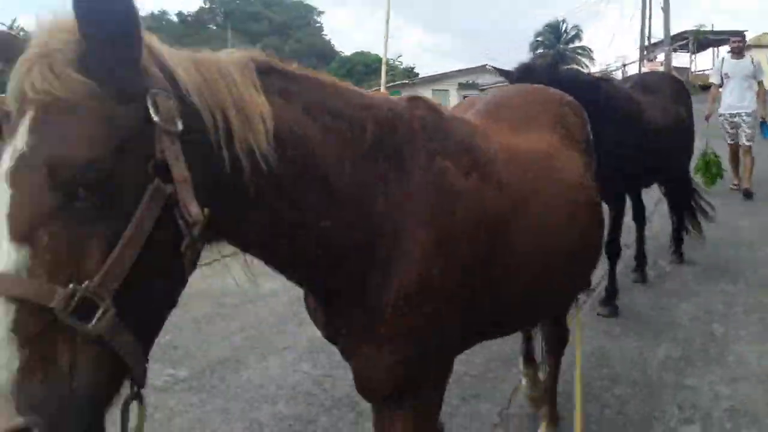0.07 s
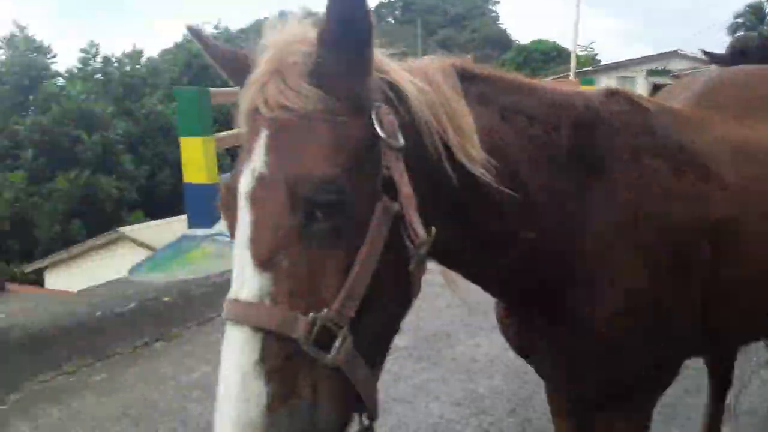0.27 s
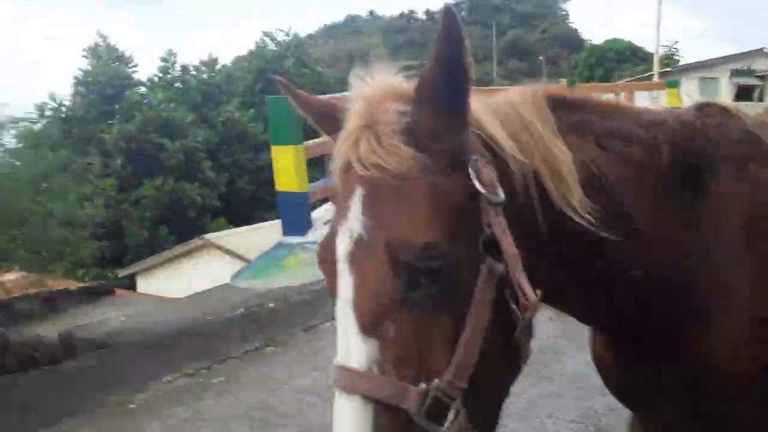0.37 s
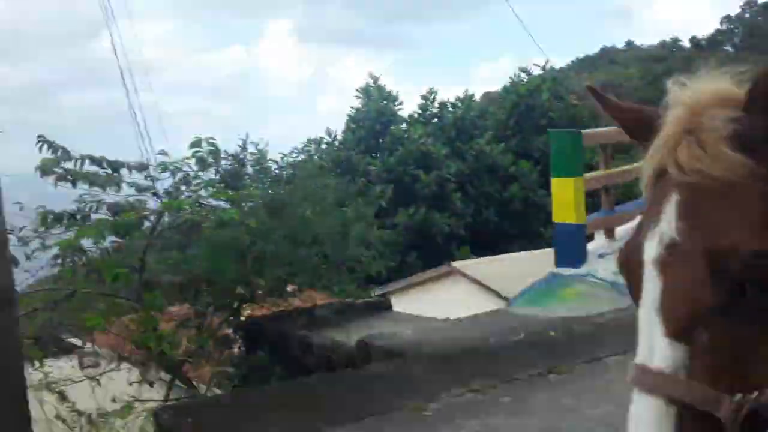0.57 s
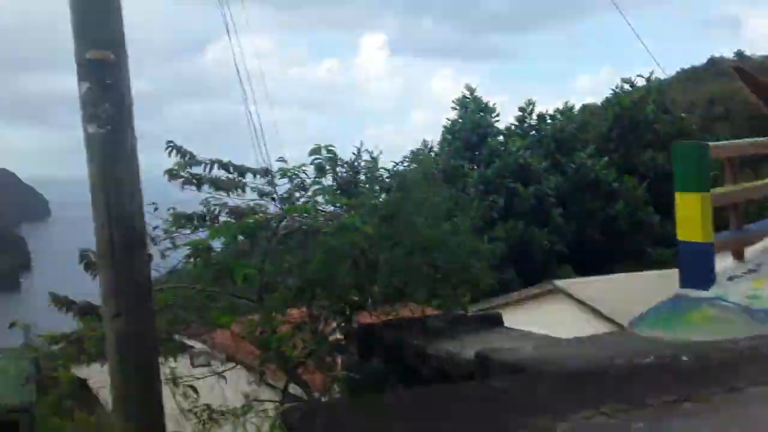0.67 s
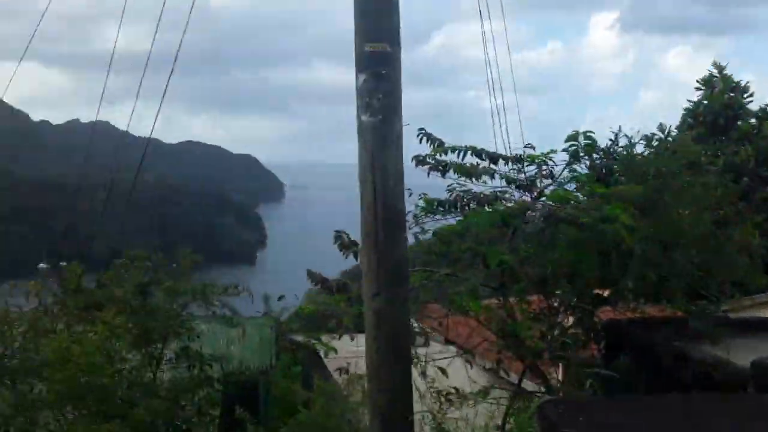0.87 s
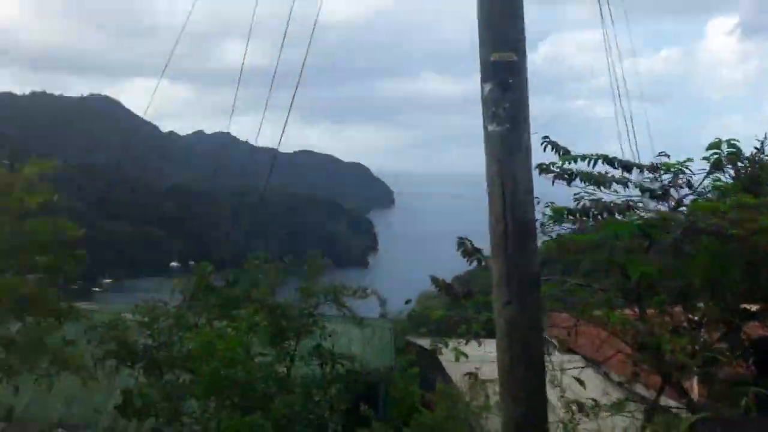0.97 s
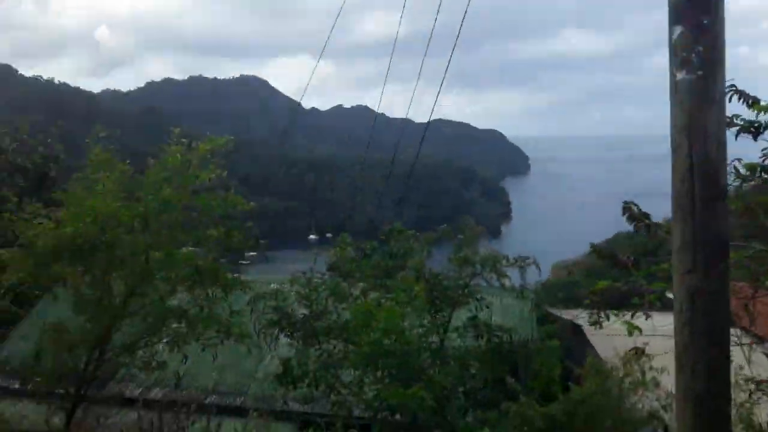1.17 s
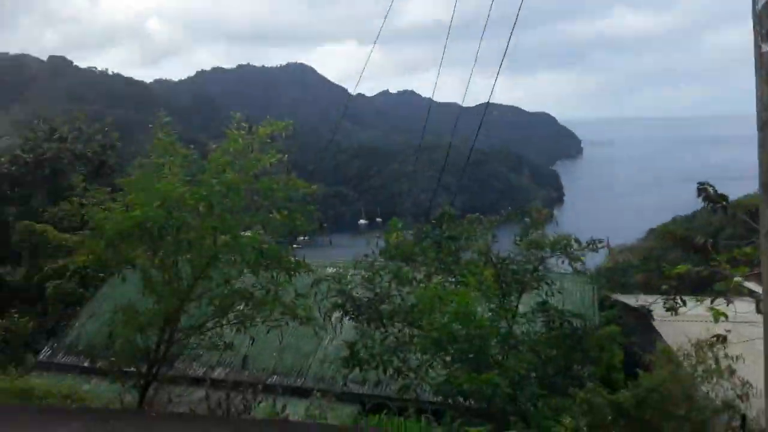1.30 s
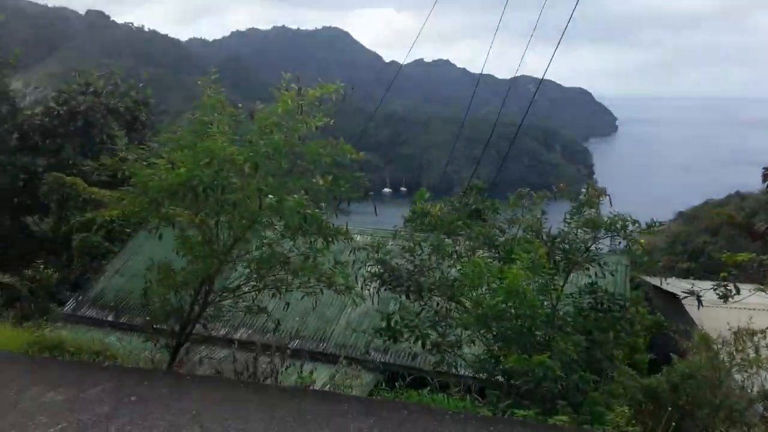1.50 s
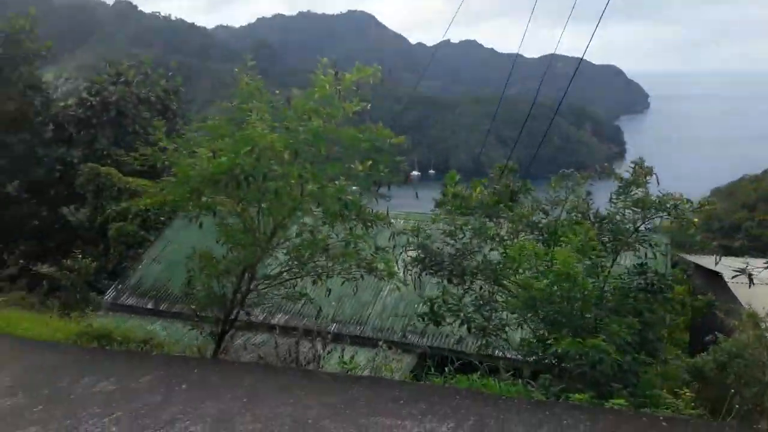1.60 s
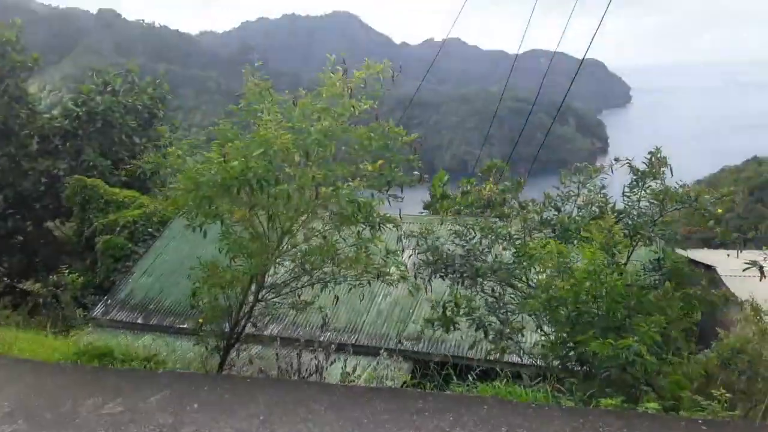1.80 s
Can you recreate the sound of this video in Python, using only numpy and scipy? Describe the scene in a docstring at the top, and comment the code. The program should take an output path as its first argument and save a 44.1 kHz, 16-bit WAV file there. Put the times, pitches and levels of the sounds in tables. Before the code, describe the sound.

Irregular horse hooves knock on an outdoor road, partly covered at first by wind thumping on the microphone. A nearby halter buckle clinks faintly, then the gust settles and the hoof taps continue among a few dull footsteps.

```python
"""Horses on a paved road

Hooves knock, ring and scuff over grit, among the dull pats of soft soles. Close by, a halter buckle
jingles as its steel parts collide. A gust buffets the microphone and settles to a low rumble.
Behind it all are a faint outdoor hiss and one thin, distant bird whistle."""
import sys
import numpy as np
from scipy import signal
from scipy.fft import rfft, irfft, next_fast_len
from scipy.io import wavfile
from scipy.ndimage import map_coordinates

SR = 44100
rng = np.random.default_rng(int(sys.argv[2]) if len(sys.argv) > 2 else 0)


def generate_wav(sig):
    """Save sig (samples, or channels by samples) to the path in sys.argv[1] as 16-bit PCM at SR."""
    pcm = np.round(np.clip(np.atleast_2d(sig).T, -1, 1) * 32767).astype(np.int16)
    wavfile.write(sys.argv[1], SR, pcm)


N = 81585


def amp(db):
    """Amplitude ratio of a level in decibels."""
    return 10 ** (np.asarray(db) / 20)


def clock(size):
    """Sample times in seconds."""
    return np.arange(size) / SR


def curve(points):
    """Linear interpolation between (time_s, value) points."""
    return np.interp(clock(N), *np.transpose(points))


def arch(start_s, length_s):
    """Half-sine envelope."""
    return np.sin(np.pi * np.clip((clock(N) - start_s) / length_s, 0, 1))


def fade(t, t60):
    """Exponential decay, 60 dB in t60 seconds."""
    return np.exp(-np.log(1000) * t / t60)


def wobble(rate_hz):
    """Smooth random modulation: a spline through Gaussian knots."""
    return map_coordinates(rng.standard_normal(2048), [clock(N) * rate_hz], mode="mirror")


def colour(x, spectrum):
    """Minimum-phase filter through (frequency_hz, gain_db) points."""
    size = 2 * next_fast_len(len(x))
    hz, db = np.transpose(spectrum)
    gain_db = np.interp(np.log(np.fft.rfftfreq(size, 1 / SR) + 1), np.log(hz), db)
    cepstrum = irfft(np.log(amp(gain_db)), size)
    cepstrum[1:size // 2] *= 2  # folding makes the filter causal
    cepstrum[size // 2 + 1:] = 0
    return irfft(rfft(x, size) * np.exp(rfft(cepstrum)), size)[:len(x)]


def noise(spectrum, size=N):
    """Filtered Gaussian noise of rms 1."""
    x = colour(rng.standard_normal(size), spectrum)
    return x / np.sqrt(np.mean(x ** 2) + 1e-20)


def impact(t, spectrum, t60):
    """Impulsive excitation: a pulse and decaying noise, filtered and scaled to peak 1."""
    force = rng.standard_normal(len(t)) * fade(t, t60) / 2
    force[0] = 2
    x = colour(force, spectrum)
    return x / np.abs(x).max()


def modal_ring(t, pitch_hz, modes):
    """Free vibration: a sum of damped modes, each slightly random in strength."""
    return sum(amp(db + rng.normal(0, 1)) * fade(t, t60) * np.sin(2 * np.pi * pitch_hz * ratio * t)
               for ratio, db, t60 in modes)


def add(out, start_s, x):
    """Superpose x on out from start_s."""
    i = min(max(round(start_s * SR), 0), N)
    out[i:i + len(x)] += x[:N - i]


# Spectra of still air, rustle and high swishes: frequency_hz, gain_db
AIR_SPECTRUM = [(30, -5), (120, -19.5), (400, -10.5), (1000, -24), (2200, -29), (5000, -81.5),
                (7000, -38.5), (16000, -31)]
RUSTLE_SPECTRUM = [(300, 0.5), (800, 8), (1250, 2), (2300, 4), (3900, 4.5), (5400, 1), (7000, -13.5),
                   (8200, -11), (9600, -28.5), (12000, -12), (14000, -13.5), (16000, -27.5)]
SWISH_SPECTRUM = [(5000, -29), (8000, -11), (9200, -10), (10300, -17), (12500, -30)]
# Envelope of the rustle: time_s, level_db
RUSTLE_ENVELOPE = [(0, -53), (.12, -54.5), (.33, -49), (.45, -53), (.53, -56.5), (.75, -56.5), (.86, -58.5),
                   (1.0, -60.5), (1.12, -68.5), (1.22, -63.5), (1.3, -57), (1.42, -56.5), (1.5, -60),
                   (1.64, -58.5), (1.75, -63.5), (1.85, -58)]
# Faint swishes: start_s, length_s, level_db
HIGH_SWISHES = [(1.103, 0.093, -72.5), (1.583, 0.057, -74)]


def outdoor_hiss():
    """Amplitude-modulated noise: a grainy rustle and brief swishes over steady air."""
    rustle_db = curve(RUSTLE_ENVELOPE) + 2 * wobble(300) + 1.2 * wobble(34.62)
    rustle = amp(rustle_db) * noise(RUSTLE_SPECTRUM)
    swish_gain = sum(amp(db) * arch(start_s, length_s) for start_s, length_s, db in HIGH_SWISHES)
    return rustle + swish_gain * noise(SWISH_SPECTRUM) + amp(-67) * noise(AIR_SPECTRUM)


def bird():
    """Frequency modulation: a distant, nearly pure whistle wavers slightly about one pitch."""
    pitch_hz = 2267 + 8 * wobble(65)
    phase = 2 * np.pi * np.cumsum(pitch_hz) / SR
    return amp(-62.5) * arch(start_s=1.555, length_s=0.26) * np.sin(phase)


# Spectra of the gust, steady breeze, low-midrange flutter and eddy pops: frequency_hz, gain_db
GUST_SPECTRUM = [(20, -25.5), (40, -21), (62, -8), (95, -3), (135, -1.5), (220, -11.5), (320, -20),
                 (500, -34), (900, -67), (2500, -86)]
BREEZE_SPECTRUM = [(20, -8), (45, 3.5), (70, 11.5), (130, -6), (250, -16), (600, -31)]
FLUTTER_SPECTRUM = [(80, -12), (190, 0), (340, -3.5), (480, -15.5), (700, -25), (1100, -46), (2500, -43)]
POP_SPECTRUM = [(100, -42.5), (300, 4.5), (550, 1.5), (800, -4.5), (1200, -18.5), (2000, -46), (5000, -77)]
# Envelopes of gust and flutter, before band-limiting: time_s, level_db
GUST_ENVELOPE = [(0, -69), (.11, -61.5), (.17, -43), (.205, -26.5), (.24, -33.5), (.34, -36), (.42, -28),
                 (.46, -31), (.55, -24), (.61, -33.5), (.7, -23), (.78, -25.5), (.86, -43.5), (.91, -44.5),
                 (1.05, -51), (1.13, -49.5), (1.2, -39), (1.28, -47), (1.38, -37), (1.47, -42), (1.56, -39),
                 (1.69, -40), (1.85, -40)]
FLUTTER_ENVELOPE = [(.15, -72), (.23, -54.5), (.28, -32.5), (.35, -27), (.4, -42), (.45, -32.5), (.56, -30),
                    (.61, -37.5), (.7, -33.5), (.76, -36), (.83, -52), (.9, -64)]
# Single eddies: centre_s, level_db, pitch_hz, relative_pop_db
WIND_EDDIES = [(.21, -14.5, 119, -22), (0.256, -25, 250, -34), (0.428, -23.5, 324, -4),
               (0.474, -13.5, 167, -6.5), (0.49, -16.5, 398, -5.5), (.52, -15, 292, -9),
               (.531, -13.5, 170, -7), (.539, -8.5, 139, -19), (0.574, -10, 183, -11),
               (0.586, -14.5, 158.5, -37), (0.641, -15, 233, -12.5), (0.688, -13.5, 216, -12),
               (0.696, -10.5, 141, -48), (0.7451, -15.5, 231, -7), (0.752, -17.5, 302, -2.5),
               (0.776, -15.5, 143, -25), (0.942, -26, 123, -43), (1.089, -32, 180, -15),
               (1.145, -25.5, 166, -16.5), (1.211, -21.5, 199, -17), (1.219, -19.5, 167, -22)]


def wind():
    """Turbulent pressure at the microphone: the flow rumbles and flutters, single eddies thump and pop."""
    out = amp(curve(GUST_ENVELOPE)) * noise(GUST_SPECTRUM) + amp(-50.5) * noise(BREEZE_SPECTRUM)
    out += amp(curve(FLUTTER_ENVELOPE) + 2 * wobble(90)) * noise(FLUTTER_SPECTRUM)
    t = clock(4096)
    middle_s = t.mean()
    width_cycles, roundness = 0.53, 1.7  # roundness: 1 is a pointed peak, 2 a Gaussian
    for centre_s, level_db, pitch_hz, pop_db in WIND_EDDIES:
        cycles = (t - middle_s) * pitch_hz
        swell = np.exp(-np.abs(cycles / width_cycles) ** roundness)
        thump = swell * np.cos(2 * np.pi * (cycles + rng.random()))
        add(out, centre_s - middle_s, amp(level_db) * thump)
        add(out, centre_s, amp(level_db + pop_db - 3) * impact(t, POP_SPECTRUM, t60=0.0056))
    out = signal.sosfilt(signal.butter(3, 910, "low", fs=SR, output="sos"), out)
    # The microphone sheds the lowest bass.
    return signal.sosfilt(signal.butter(2, 68.6, "high", fs=SR, output="sos"), out)


# Spectrum of rubbing fittings: frequency_hz, gain_db
SLIDE_SPECTRUM = [(1000, 2), (3800, -21), (5300, 14), (7000, -27), (9500, -13), (11000, -1.5), (13300, -12),
                  (16000, -25)]
# Slips of the fittings: start_s, length_s, level_db
HALTER_SLIDES = [(0.137, 0.023, -67), (0.691, 0.042, -58), (1.637, 0.0098, -64)]


def halter_slides():
    """Sliding friction: halter fittings rub together with a thin, uneven rasp."""
    strokes = sum(amp(db) * arch(start_s, length_s) for start_s, length_s, db in HALTER_SLIDES)
    return strokes * amp(6.1 * wobble(900)) * noise(SLIDE_SPECTRUM)


# Spectrum of a steel contact: frequency_hz, gain_db
CLICK_SPECTRUM = [(500, 11), (2000, 7), (3800, 7), (5600, 9), (7000, -11), (9300, -16.5), (11000, -1.5),
                  (13500, -0.5), (16000, -13.5)]
# Modes of the buckle: pitch_ratio, gain_db, t60_s
BUCKLE_MODES = [(.775, -15, .025), (.975, -6, .02), (1, 0, .075)]
# Buckle contacts: start_s, click_gain_db, ring_gain_db, pitch_hz
BUCKLE_CLINKS = [(.1295, -36, -41, 13550), (.1665, -28, -44, 13150), (.204, -52, -48, 13620),
                 (.221, -46, -48, 13620), (.513, -32, -60, 13600), (.5855, -46, -41, 13650),
                 (.7625, -30, -41, 13610), (.7825, -27, -47, 13200), (.8575, -38, -64, 13100),
                 (.95, -52, -49, 13620), (1.4385, -41, -49, 13660), (1.64, -46, -56, 13200)]


def buckle():
    """Impact excitation of small steel parts: a click, a rattle and very high ringing modes."""
    out, t = np.zeros(N), clock(9000)
    for start_s, click_db, ring_db, pitch_hz in BUCKLE_CLINKS:
        ring = modal_ring(t, pitch_hz, BUCKLE_MODES)
        ring *= 1 + 0.45 * wobble(260)[:len(t)]  # loose parts make the ring stutter
        rattle = amp(-16) * noise(CLICK_SPECTRUM, len(t)) * fade(t, t60=0.05)
        click = impact(t, CLICK_SPECTRUM, t60=0.0034)
        add(out, start_s, amp(click_db + 2.5) * (click + rattle) + amp(ring_db - 7) * ring)
    return out


# Spectrum of a soft sole: frequency_hz, gain_db
SOLE_SPECTRUM = [(100, -20), (300, -4), (500, 2), (900, -7), (2000, -15.5), (5000, -56), (16000, -75)]
# Soft footfalls: start_s, peak_db
FOOTFALLS = [(0.997, -38.5), (1.2464, -38), (1.577, -35.5), (1.5972, -28.5), (1.821, -33.5)]


def soft_steps():
    """Compliant contact: soft soles give dull pats with little treble."""
    out, t = np.zeros(N), clock(6000)
    for start_s, peak_db in FOOTFALLS:
        add(out, start_s, amp(peak_db) * impact(t, SOLE_SPECTRUM, t60=0.022))
    return out


# Spectrum of grit, scraped or crushed: frequency_hz, gain_db
GRIT_SPECTRUM = [(200, -9), (600, 15), (1200, 11), (2300, 9), (3200, 5.5), (4200, 10), (5500, -7),
                 (7000, -18), (9500, -20), (13000, -61), (16000, -13)]
# Hoof drags: start_s, length_s, level_db
HOOF_SCUFFS = [(0.132, 0.15, -52.5), (0.202, 0.042, -56.5), (0.418, .04, -62), (1.295, .09, -58),
               (1.802, 0.052, -42.5)]


def hoof_scuffs(attack_s=0.029, grain_db=4.5):
    """Friction on a rough surface: hooves drag over grit in scrapes that rise fast and run out."""
    out = np.zeros(N)
    for start_s, length_s, level_db in HOOF_SCUFFS:
        stroke = curve([(start_s, 0), (start_s + attack_s, 1), (start_s + length_s, 0)])
        out += amp(level_db + grain_db * wobble(700)) * stroke * noise(GRIT_SPECTRUM)
    return out


# Stones cracking under the hooves: start_s, gain_db, pitch_hz
STONE_SNAPS = [(0.1326, -30.5, 2900), (0.453, -31.5, 4150), (0.727, -37.5, 2740), (0.7884, -45, 5200),
               (.813, -39, 3530), (1.279, -41.5, 5200), (1.323, -33.5, 4060), (1.336, -38, 2600),
               (1.353, -40, 3000), (1.512, -39.5, 3260), (1.536, -46, 5400)]


def stone_snaps(roughness=0.52):
    """Brittle fracture: small stones crack with a short, rough ring."""
    out, t = np.zeros(N), clock(2048)
    for start_s, gain_db, pitch_hz in STONE_SNAPS:
        ring = np.sin(2 * np.pi * pitch_hz * t) + roughness * noise(GRIT_SPECTRUM, len(t))
        add(out, start_s, amp(gain_db) * fade(t, t60=0.014) * ring / 2)
    return out


# Spectrum of a knock on the road: frequency_hz, gain_db
KNOCK_SPECTRUM = [(100, 22), (400, 22), (1000, 9.5), (2400, 4.5), (4500, -11.5), (6500, -48), (9000, -51),
                  (16000, -63)]
# Modes of the hollow hoof: pitch_ratio, gain_db, t60_s
HOOF_RESONANCES = [(1, 4, .007), (1.2, -3, .006), (1.95, -10, .005)]
# Hoof strikes: start_s, ring_peak_db, pitch_hz, relative_knock_db
HOOF_STRIKES = [(0.0596, -39, 2480, -11), (0.1374, -34, 1510, 2.5), (0.222, -35, 2480, -31),
                (0.3881, -29, 1990, -10), (0.5732, -34.5, 2350, -1), (0.704, -33.5, 1296, -28),
                (.818, -35, 2680, 4), (.9365, -37.5, 2020, -18), (0.9776, -33.5, 1710, -32),
                (0.994, -55, 1500, 20.5), (1.255, -36.5, 1560, 12), (1.3155, -28.5, 2100, -32),
                (1.3648, -23.5, 2225, -9), (1.4379, -39, 2300, -3), (1.5579, -34.5, 1570, 7.5),
                (1.8001, -29.5, 2320, -11), (1.8234, -42, 2500, 7)]


def hoof_clops(seating_s=0.0002, reflection_s=0.00376):
    """Damped resonance: each strike knocks the road, rings the hollow hoof and crushes a little grit."""
    out, t = np.zeros(N), clock(6000)
    horn_damping = signal.butter(4, 5060, "low", fs=SR, output="sos")
    build_up = 1 - np.exp(-t / seating_s)  # the ring grows while the hoof seats
    for start_s, ring_db, pitch_hz, knock_db in HOOF_STRIKES:
        ring = signal.sosfilt(horn_damping, build_up * modal_ring(t, pitch_hz, HOOF_RESONANCES))
        grit = amp(-16) * noise(GRIT_SPECTRUM, len(t)) * fade(t, t60=0.06)
        knock = amp(knock_db) * impact(t, KNOCK_SPECTRUM, t60=0.005)
        clop = amp(ring_db) * (ring / np.abs(ring).max() + knock + grit)
        add(out, start_s, clop)
        add(out, start_s + reflection_s, amp(-18) * clop)  # reflection off the road
    return out


def street_reverb(x):
    """Diffuse reflection: walls and trees return a short, decaying tail."""
    t = clock(SR // 2)
    tail = rng.standard_normal(len(t)) * fade(t, t60=0.25)
    return signal.fftconvolve(x, tail / np.linalg.norm(tail))[:N]


def scene():
    """Superposition in one channel: only the sounds of the feet reverberate."""
    feet = hoof_clops() + soft_steps() + hoof_scuffs() + stone_snaps()
    reflections = amp(-14) * street_reverb(feet)
    return (feet + reflections + buckle() + halter_slides() + wind() + outdoor_hiss() + bird())[None]


def record(dry, top_hz=16000):
    """Band limiting: an ideal low-pass filter removes everything above top_hz."""
    size = next_fast_len(N + SR // 2)
    passband = np.fft.rfftfreq(size, 1 / SR) < top_hz
    return irfft(rfft(dry, size) * passband, size)[:, :N]


dry = scene()
out = record(dry)
generate_wav(out)
```